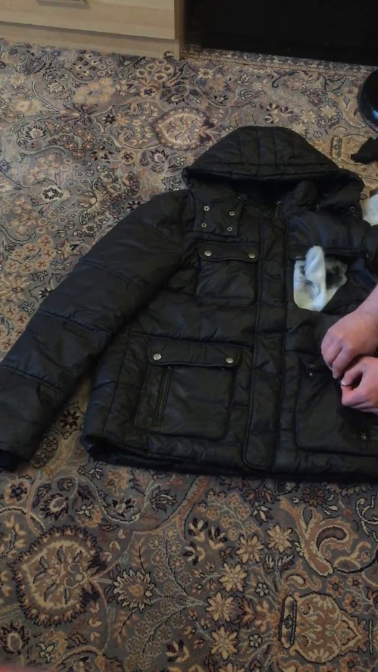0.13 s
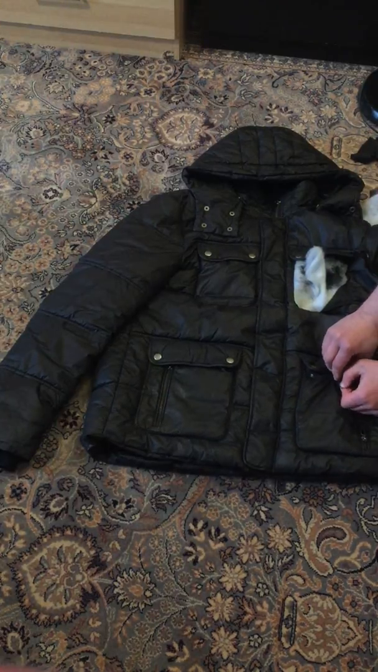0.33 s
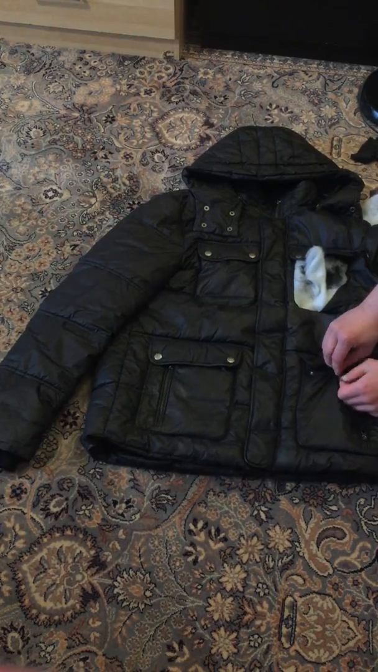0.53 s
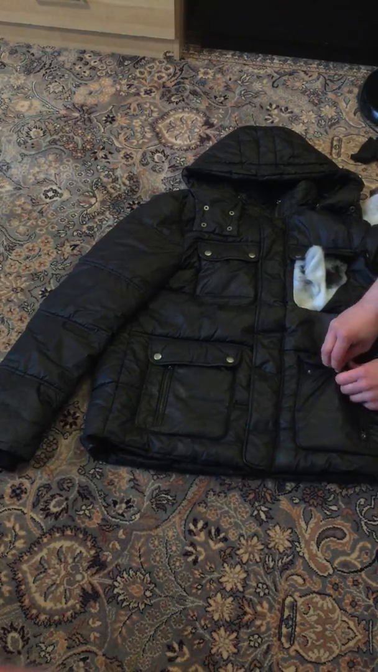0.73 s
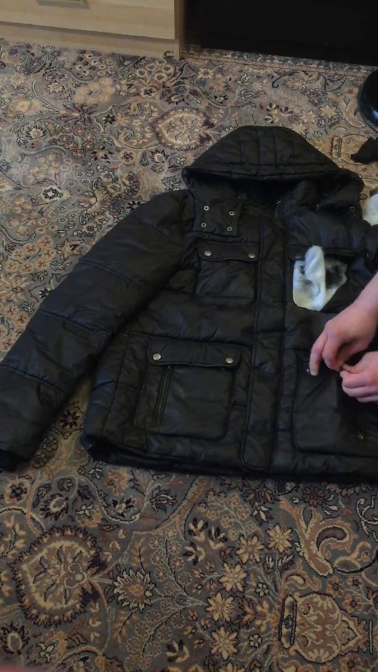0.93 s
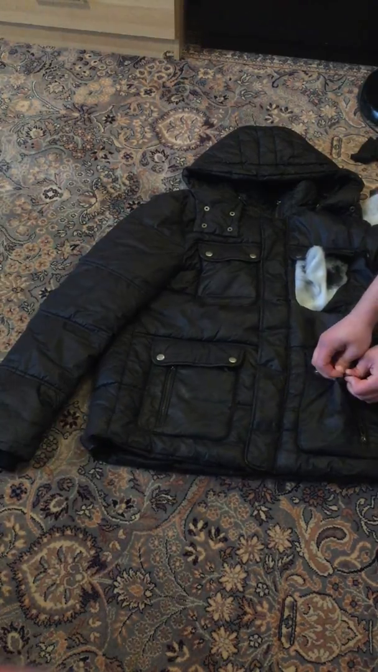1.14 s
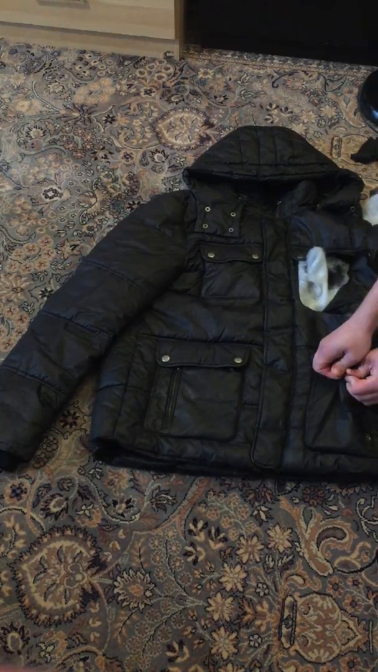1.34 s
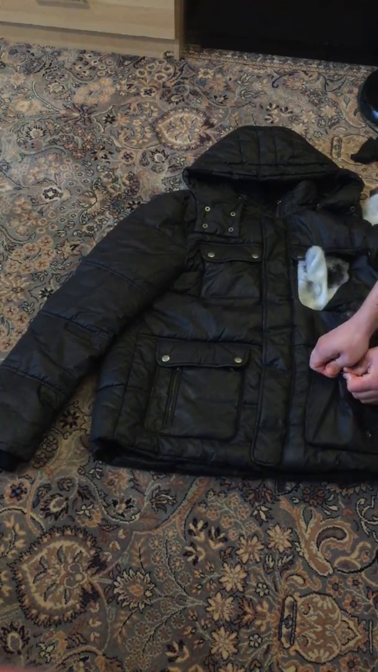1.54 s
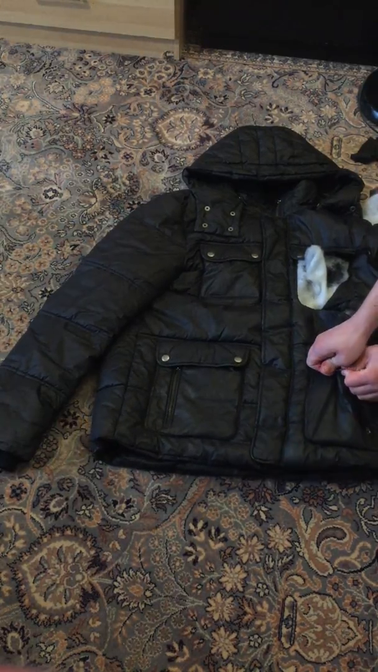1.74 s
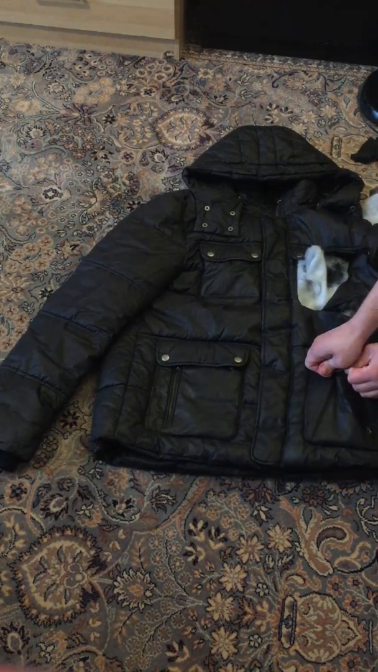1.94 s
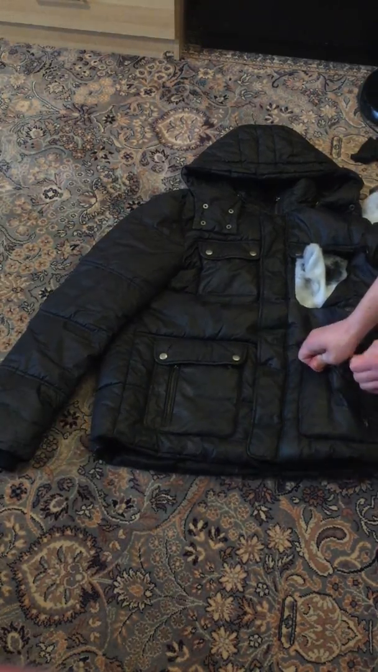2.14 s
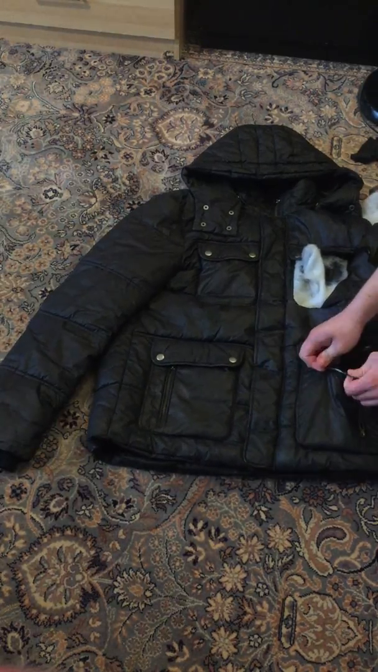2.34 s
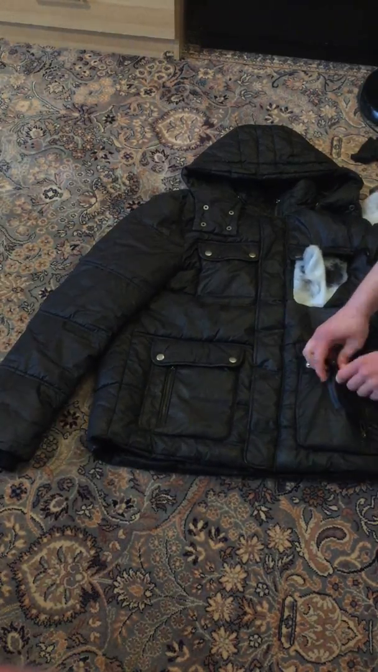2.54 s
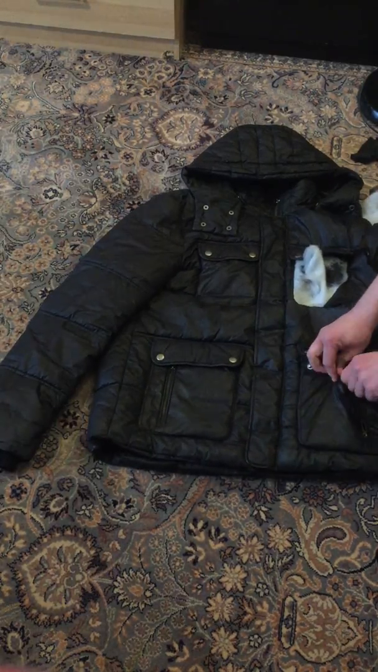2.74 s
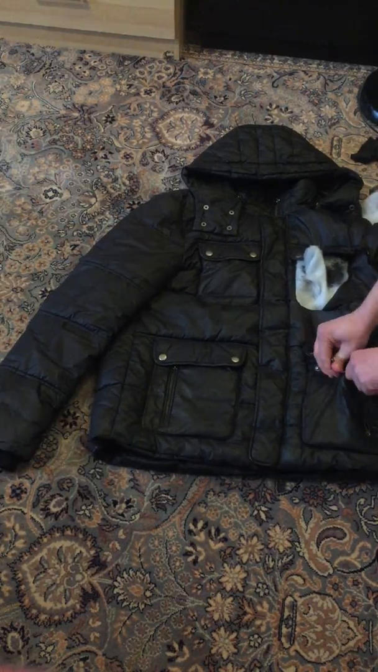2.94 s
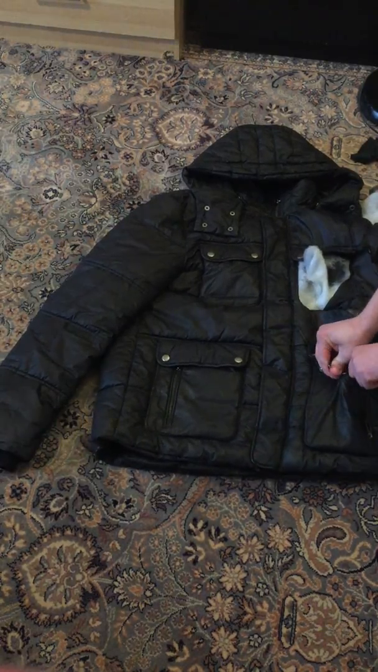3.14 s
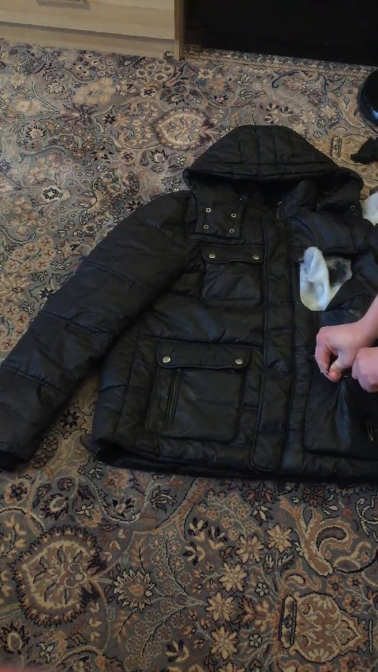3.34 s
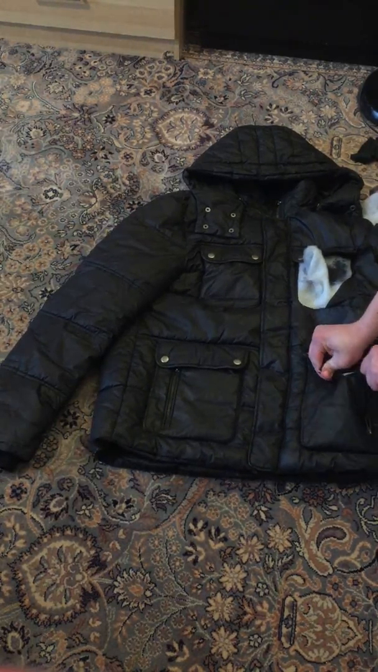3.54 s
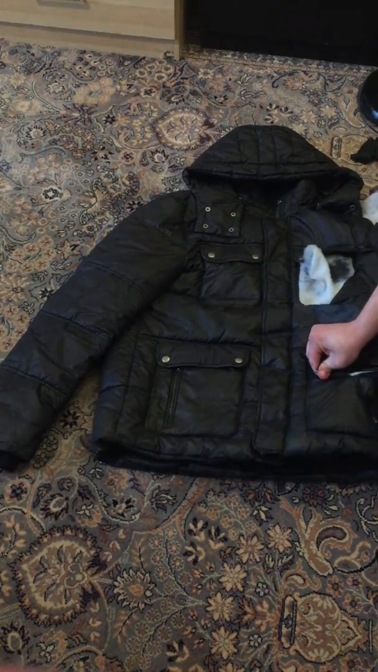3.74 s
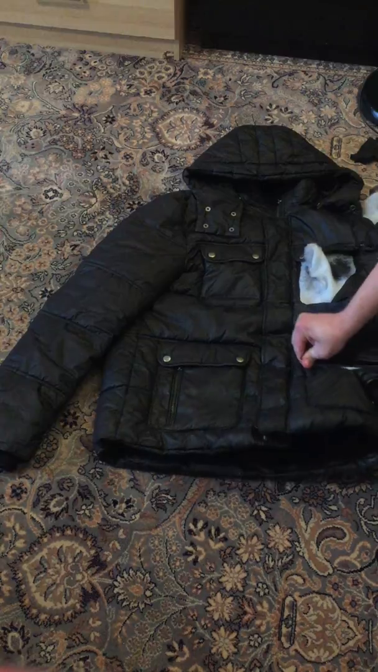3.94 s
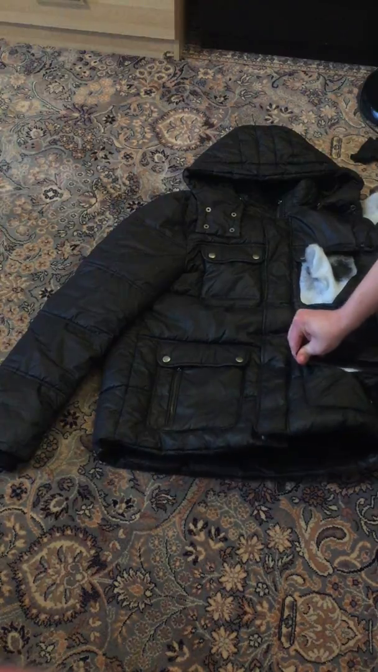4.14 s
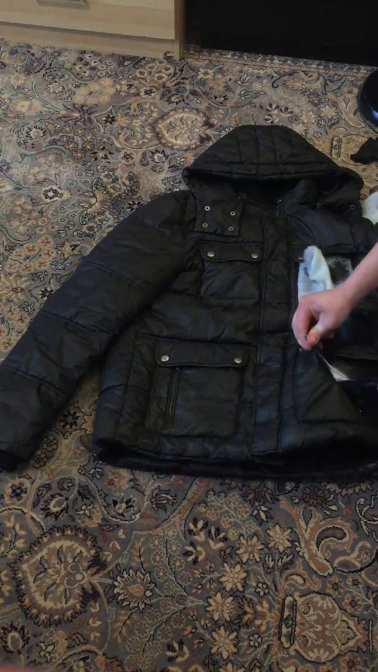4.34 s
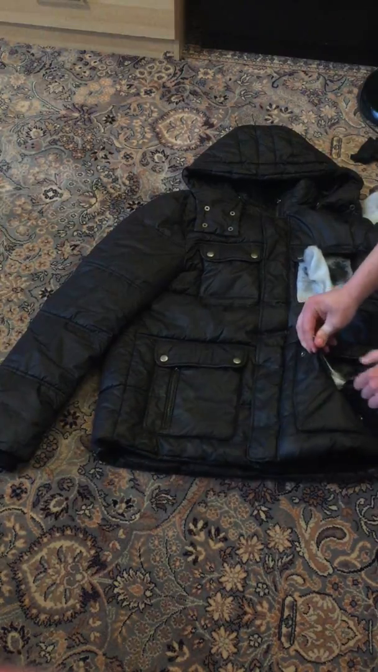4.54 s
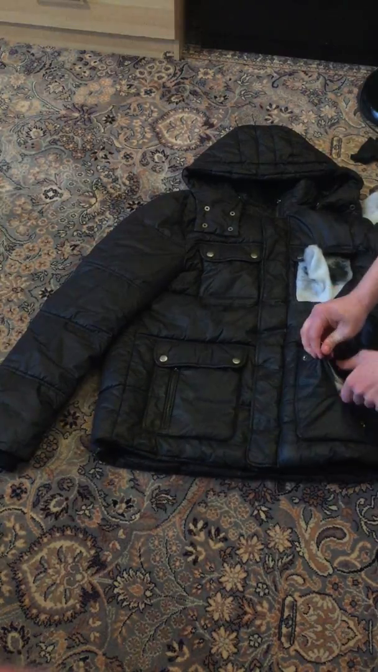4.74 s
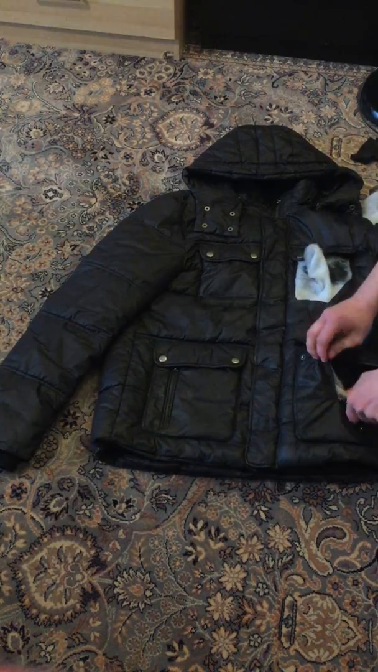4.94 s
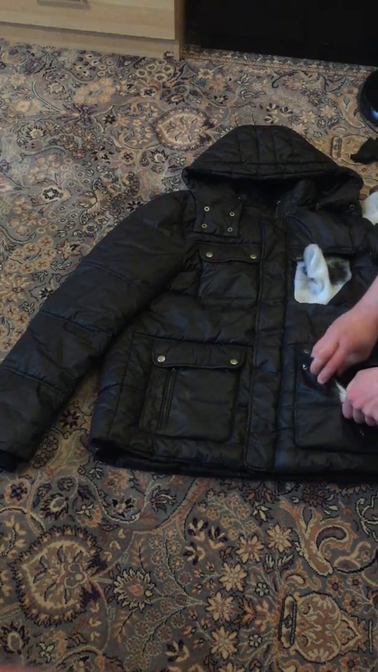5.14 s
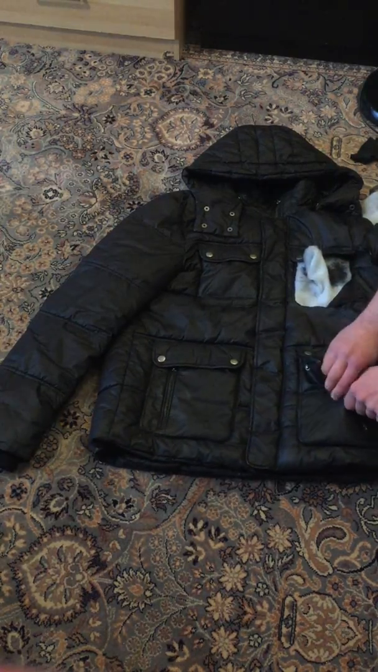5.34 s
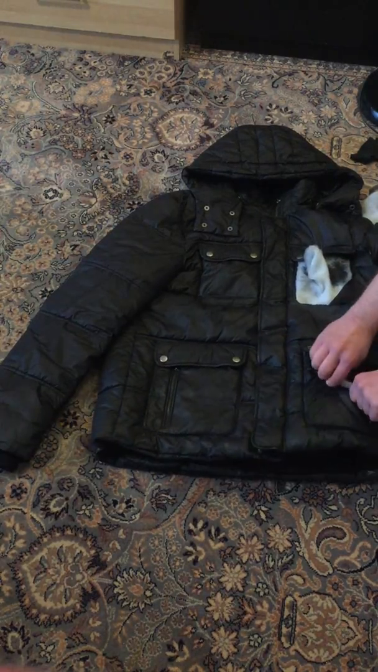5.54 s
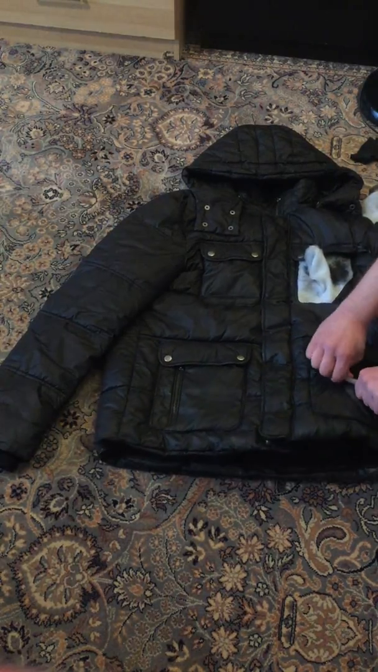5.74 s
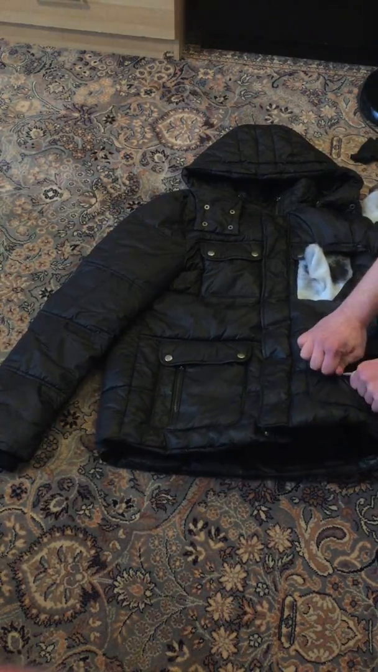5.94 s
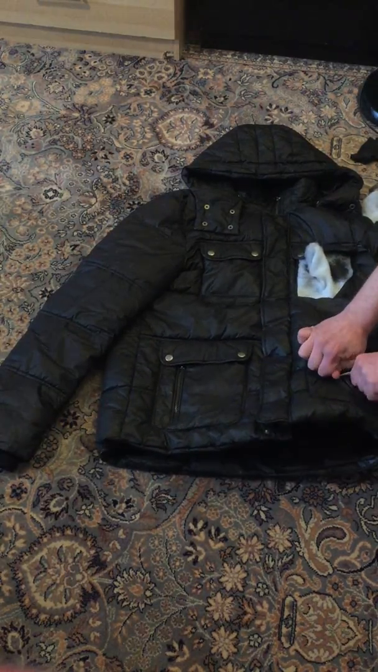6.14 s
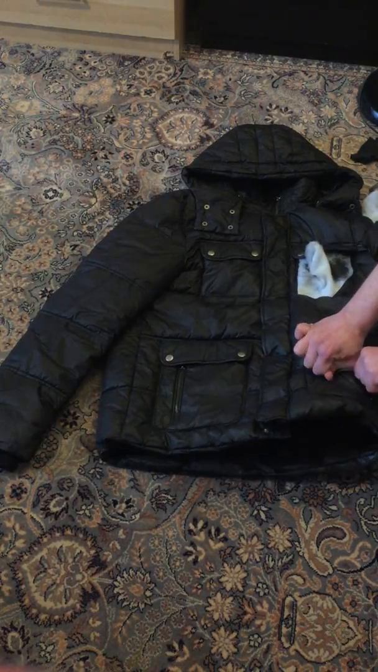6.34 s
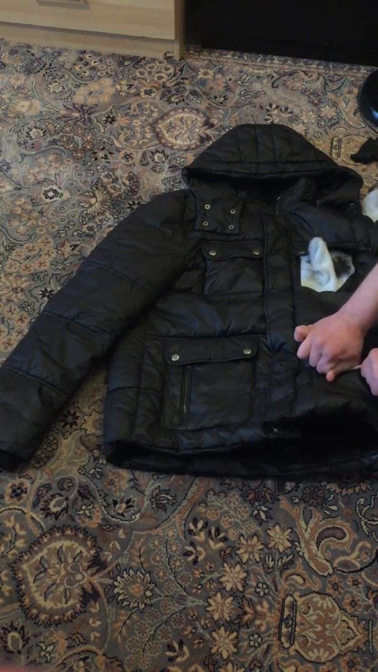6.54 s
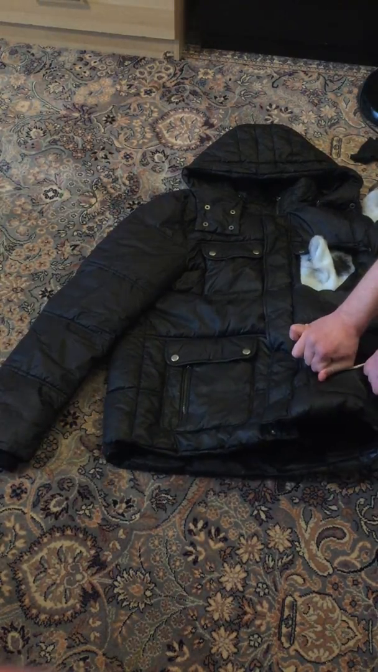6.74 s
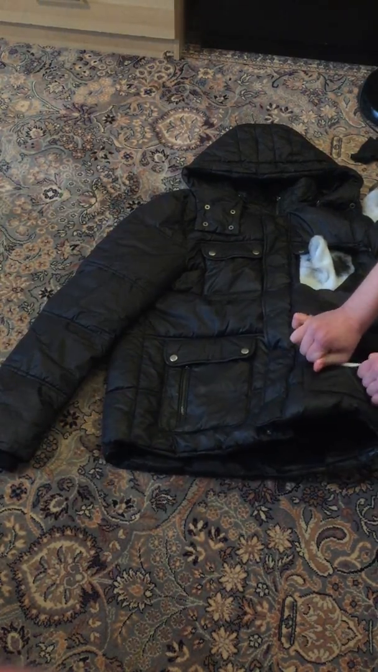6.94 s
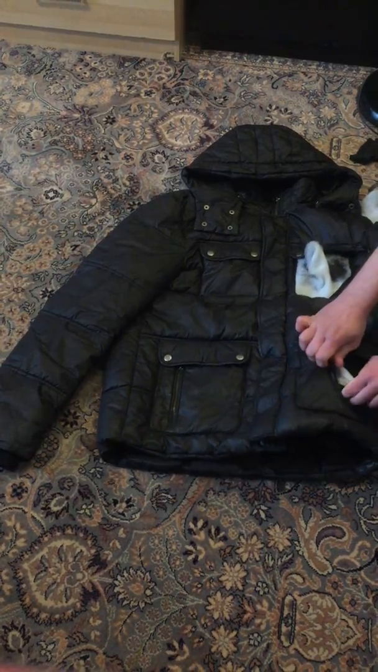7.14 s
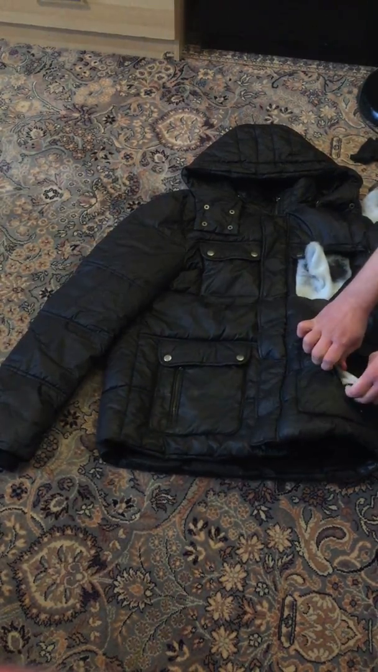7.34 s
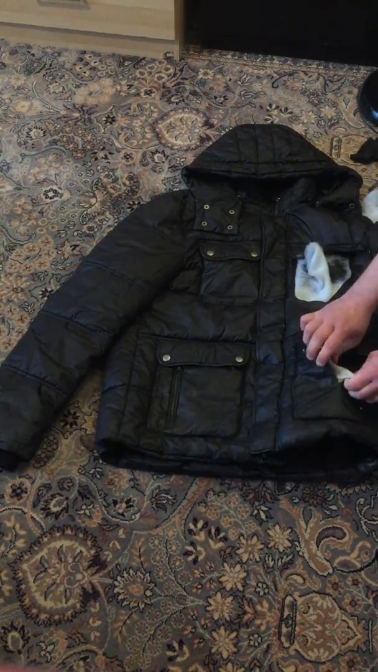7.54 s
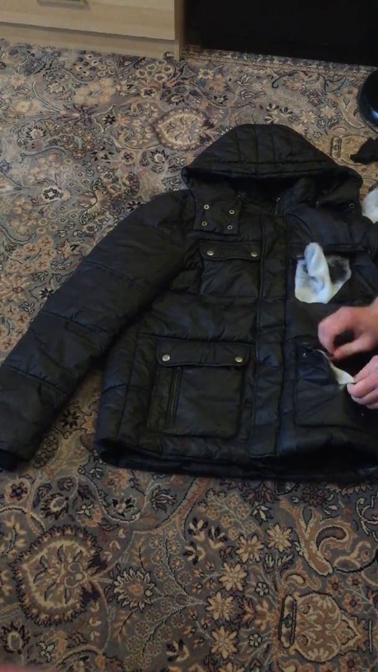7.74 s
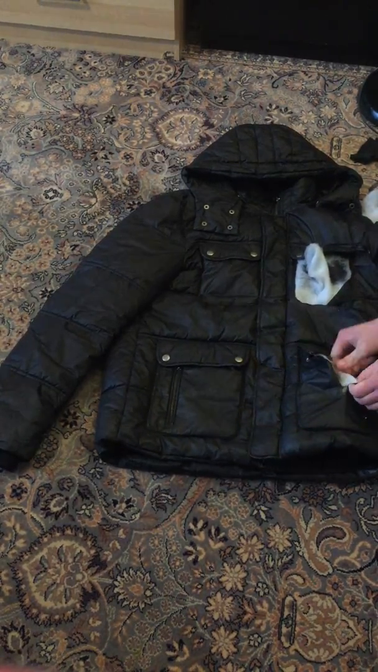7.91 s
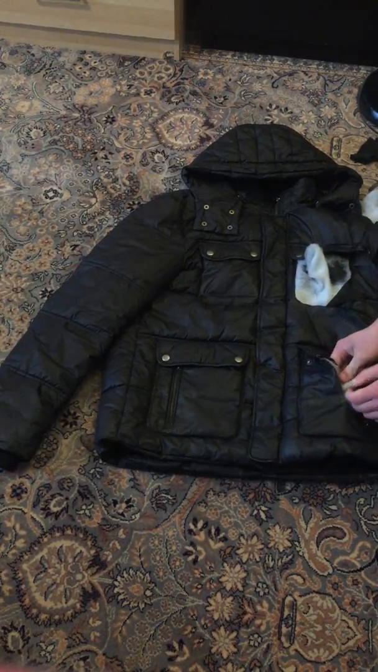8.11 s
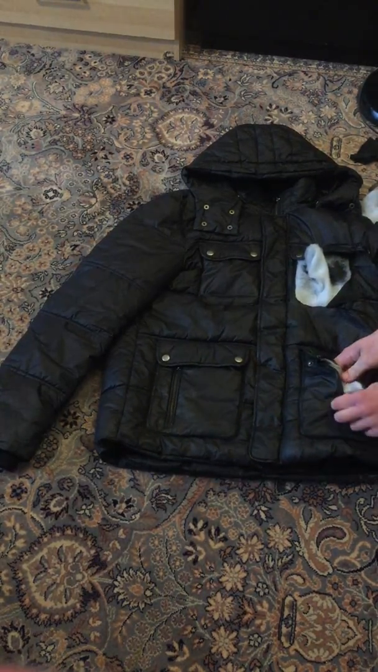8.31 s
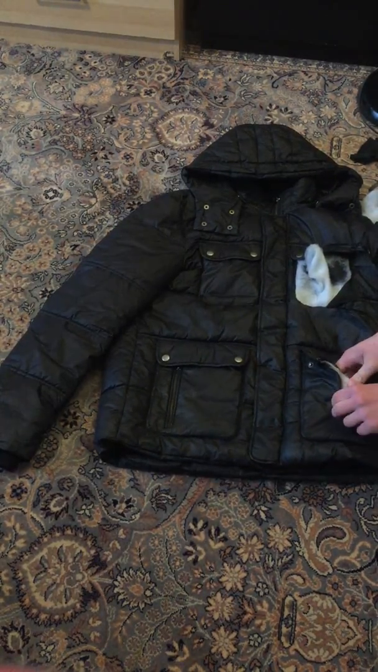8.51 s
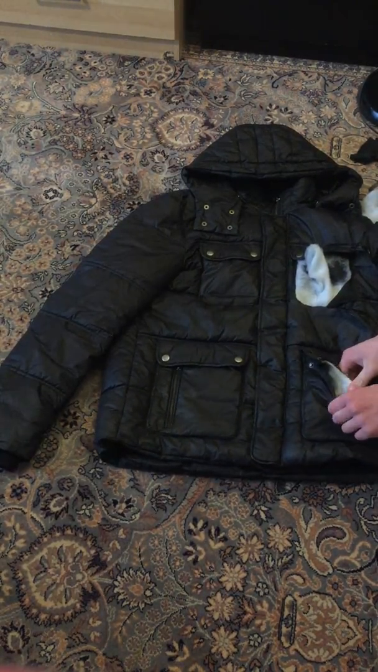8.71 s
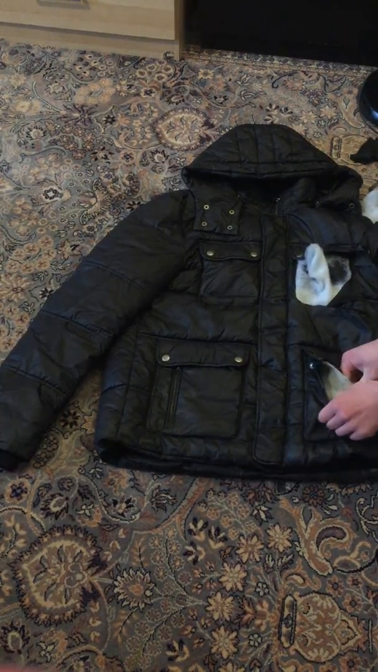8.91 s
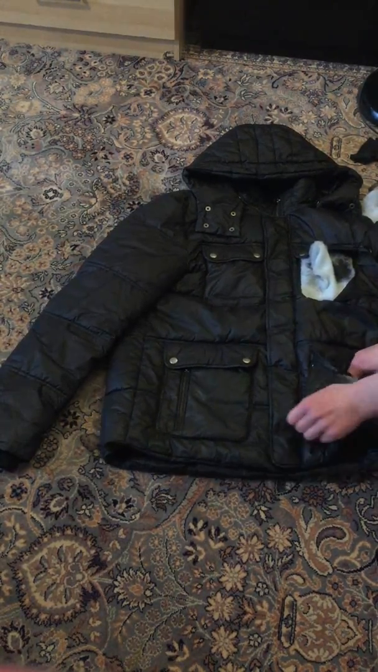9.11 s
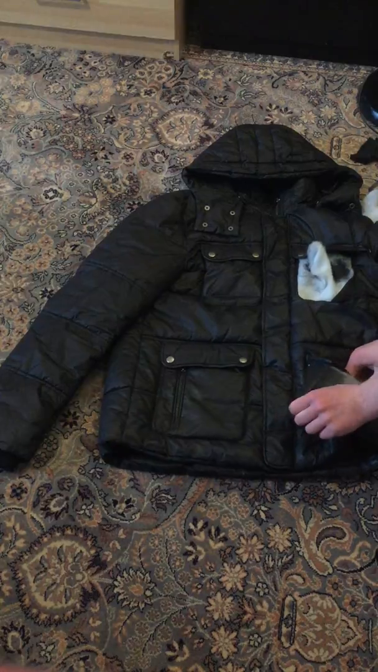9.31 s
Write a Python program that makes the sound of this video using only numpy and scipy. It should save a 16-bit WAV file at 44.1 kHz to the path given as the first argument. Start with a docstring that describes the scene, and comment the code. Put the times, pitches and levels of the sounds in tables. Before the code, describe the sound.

A quiet small room with steady soft hiss and a faint low engine hum swelling outside. In the first 1.8 s there is only gentle rustling of slick padded cloth and a tiny tick near 0.8. From about 1.9 to 2.3 s a short, crisp rip crackles out with several sharp snaps and a dull tug. Light swishes follow; a soft knock falls at 3.1. At 3.2 the cloth tears again, then from 3.4 to 4.2 s it rips long and loud, dense gritty crackle studded with hard cracks, strongest toward the end. Quiet rustling until 6.1, then dry stitches pop singly and rapidly until 6.95, the last very loud. Soft swishing around 7.2 and 8 s, with a small knock at 7.7. At 9.07 a dull jerk starts a thick, fast rip lasting a quarter second, leaving a short room ring. Close microphone.

```python
"""The synthetic shell of a padded jacket is ripped by hand in a small, quiet room.
Brittle fracture: stitches snap singly, each a jolt; the weave then fails in runs, as hails of random breaks.
Radiation: flapping panel, taut cloth and thread colour every break, and creases and folds resonate.
Friction: fine grains swish as cloth slides on itself; sudden tension: slack cloth jerks taut with dull knocks.
Reverberation adds a short cluster and a ringing tail; an engine outside hums faintly under a steady hiss."""
import sys
import numpy as np
from scipy import signal
from scipy.fft import rfft, irfft
from scipy.io import wavfile
from scipy.ndimage import uniform_filter1d, map_coordinates

SR = 44100
rng = np.random.default_rng(int(sys.argv[2]) if len(sys.argv) > 2 else 0)


def generate_wav(signal):
    """Clip the signal to [-1, 1] and save it as 16-bit WAV at the path in sys.argv[1]."""
    frames = np.transpose(np.atleast_2d(signal))
    scaled = np.clip(frames, -1, 1) * 32767
    pcm = np.round(scaled).astype(np.int16)
    wavfile.write(sys.argv[1], SR, pcm)


N = 413216
TIME = np.arange(N) / SR

# Table levels are relative; each source adds its own gain.
# still air and hiss, spectral density: (f/Hz, level/dB per Hz)
AIR_SPECTRUM = [(26, -20.5), (45, -10), (82, -5), (156, -10.5), (362, -13), (763, -18), (2220, -18.5),
                (9200, -28), (10400, -31), (11700, -28), (17000, -38.5)]
# swells of the engine outside: (t of peak/s, 1/e half-width/s, firing rate f/Hz, level/dB, octave re fundamental/dB)
ENGINE_SWELLS = [(.7, 0.3, 85, -71, -14), (1.25, 0.34, 86.4, -83.5, 10), (1.8, 0.37, 85.9, -67.5, -11.5),
                 (2.902, 0.613, 58.2, -70, -9.5), (6.35, 0.62, 64.5, -63.5, -15.5),
                 (7.6, 0.87, 65.5, -71.5, -3.5)]
# spectrum of the room tail: (f/Hz, level/dB)
TAIL_SPECTRUM = [(100, -2.5), (400, -3.5), (1100, -0.5), (1700, 0), (2700, -3), (5500, -6), (9000, -14.5),
                 (17000, -8.5)]
# reverberation time of the tail: (f/Hz, T60/s)
TAIL_DECAY = [(100, .26), (700, 0.27), (2000, 0.24), (5000, 0.22), (16000, 0.21)]
# pitches at which the room rings on most clearly: (f/Hz)
ROOM_RINGS_HZ = [365, 1367, 1548, 1668, 1880, 2389, 2666, 3188]
# cloth jerking taut: (t/s, level/dB, thump weight/dB, thump lag/s, slap centre f/Hz, thump f/Hz)
KNOCKS = [(0.819, -36.5, -21, 0.0022, 1290, 290), (2.158, -28, 8, 0.001, 1600, 200),
          (3.066, -23, 4, 0.008, 1650, 276), (3.477, -36, 9.5, 0.001, 1880, 318),
          (7.681, -30, -4.5, 0.0039, 1900, 325), (9.068, -26, 2, 0.0021, 1710, 353),
          (9.08, -33, 17.5, 0.002, 1600, 400)]
# cloth sliding under the hands: (t of peak/s, 1/e half-width/s, level/dB, brightness/dB)
SWISHES = [(0.715, 0.11, -70, -8), (1.032, 0.0098, -61, -4), (1.04, 0.23, -69, -5),
           (1.324, 0.077, -66, -10), (2.557, 0.031, -71.5, 3.5), (2.814, 0.07, -69.5, 3.5),
           (4.38, 0.17, -69, -4.5), (4.955, 0.29, -71.5, -2), (5.458, 0.024, -68, -3),
           (7.236, 0.0024, -54, -3.5), (7.265, 0.067, -64.5, 1), (7.96, 0.038, -69, 13),
           (8.028, 0.11, -70, -0.5)]
# taut folds that resonate: (t of peak/s, 1/e half-width/s, f/Hz, boost/dB, width as a share of f)
FOLDS = [(1.028, 0.023, 2700, 9.5, .14), (2.202, 0.026, 2000, 8, 0.43), (2.205, 0.016, 8600, 8, .14),
         (3.66, 0.09, 1450, 11.5, 0.39), (3.757, 0.039, 11700, 7.5, 0.13), (3.68, 0.3, 5200, 5, .06),
         (3.782, 0.099, 808, 6.5, .3), (4.023, 0.049, 1330, 11, 0.23), (4.064, 0.068, 289, 6, 0.27),
         (6.679, 0.15, 8100, 6, 0.2), (7.96, 0.091, 2800, 11, 0.12), (9.126, 0.017, 4300, 12.5, 0.23),
         (9.143, 0.097, 596, 14, 0.24), (9.15, 0.033, 9500, 7.5, 0.07), (9.206, 0.019, 11700, 9.5, 0.18),
         (9.213, 0.03, 1500, 8, 0.38)]
# spectrum of a breaking thread: (f/Hz, level/dB)
THREAD_SPECTRUM = [(50, -23), (160, -9), (245, -2), (340, 2), (480, -4), (690, -2.5), (1000, -10),
                   (1450, -1), (3200, -0.5), (9400, 1), (10450, -4.5), (11500, -3), (13500, -6),
                   (17000, -10.5)]
# corner points of the flap, body, middle and edge ranges: (f/Hz)
RANGES_HZ = [600, 1500, 3200, 6000, 9500, 12000]
# loudest stitches, each snapping alone: (t/s, level/dB, body/dB, edge/dB)
SNAPS = [(0.819, -27, 0.5, 1), (1.957, -29, -11, 11), (2.043, -13.5, 6, 8), (2.1567, -9.5, 3.5, 6),
         (2.169, -14.5, 3, 15), (2.2315, -11.5, 1.5, 4), (2.263, -13.5, -1, 13), (2.276, -20, 9, 16),
         (2.289, -23, -4, 7), (3.2325, -11, -5.5, 4), (3.301, -13.5, -17, 7), (3.3712, -18.5, -5, 12),
         (3.4204, -10, -5, 5), (3.4513, -8.5, -8.5, 6), (3.4776, -8.5, 2.5, 3), (3.5164, -7.5, -2, 1),
         (3.5304, -10, -14.5, 3.5), (3.542, -9, -2, 3.5), (3.554, -12, -13, 1), (3.562, -9, -20, 0),
         (3.598, -19, 4, 13), (3.612, -10, 0.5, 4), (3.6406, -10, -3.5, 4), (3.6858, -3.5, -2.5, 3),
         (3.719, -7, -10, 0), (3.904, -5.5, 3.5, -3), (3.9845, -8, 0, 8), (4.0236, -12.5, 8.5, 16),
         (4.0908, -2, -24, 4), (4.1297, -9, -5, -1), (4.1364, -6, -7, -2), (4.142, -7, -14, -1.5),
         (4.1478, -10, 7, 0.5), (4.1583, 0.5, -3, -11), (4.1829, -9, 1.5, -3), (6.1386, -9, -22, 6),
         (6.1396, -9, -11.5, -1), (6.185, -6.5, -11.5, -11), (6.197, -17, -10, 5), (6.208, -7, -14, -6.5),
         (6.243, -8, -5.5, -10), (6.2554, -15, -3, -1), (6.261, -15, -7, 3), (6.2733, -9, -12, -6),
         (6.2939, -10, -3, 1), (6.313, -9, -6.5, -3), (6.3399, -8, -1, 0), (6.3592, -10.5, -5, 2),
         (6.3899, -10.5, 4, 6), (6.4196, -24, -20, 5), (6.44, -6, 3, 1), (6.4486, -9.5, -6, -2),
         (6.474, -12, 4, 5), (6.5874, -6.5, -6.5, -2), (6.6101, -11.5, -6.5, 4), (6.6423, -11.5, -7, -3),
         (6.686, -14, -9, -2), (6.7014, -17, -10, 2), (6.714, -12.5, -13, -2.5), (6.7331, -11.5, -12, 2),
         (6.7509, -7.5, -7, -13), (6.7662, -7.5, -8, -3), (6.782, -14.5, 0.5, -6), (6.7866, -13, 4, -1),
         (6.8108, -9.5, 1, -2), (6.8593, -16, 0, 6), (6.8779, -7.5, -0.5, -3), (6.9072, -0.5, 1, -9),
         (6.9444, -7, -3, -2), (9.068, -18, 15.5, 3), (9.213, -12, 3, 8), (9.2275, -11, 5, 7),
         (9.232, -15, -3, 16.5), (9.244, -13, 14, 10), (9.2581, -13.5, 15.5, 3), (9.266, -18.5, 15, 0),
         (9.281, -17, 9, 1)]
# a loaded seam shedding small ticks: (start t/s, end t/s, level/dB)
STRAINS = [(1.903, 1.98, -36), (3.275, 3.51, -27.5), (6.737, 6.9, -45)]
# runs of the tear: (start t/s, time to top speed/s, length/s, level/dB, breaks per s, body/dB, edge/dB, flap/dB)
RUNS = [(1.867, 0.013, 0.026, -46, 1700, -5.5, 9, -2), (1.964, 0.045, 0.12, -45, 1030, 1, 9, -8),
        (2.157, 0.044, 0.15, -31.5, 1700, 0, 8.5, -6), (3.231, 0.02, 0.078, -41, 910, -0.5, 3, -6.5),
        (3.471, 0.003, 0.035, -34.5, 2900, -5, 7, -10), (3.512, 0.13, 0.11, -28.5, 1620, -3.5, 3, -7),
        (3.637, 0.018, 0.061, -30, 1340, -4.5, 3, -2.5), (3.695, 0.056, 0.16, -23.5, 3400, -3, -0.5, -6.5),
        (3.865, 0.0057, 0.037, -30.5, 1250, -1.5, 0, -6), (3.905, 0.032, 0.13, -28.5, 1940, 0.5, 6.5, -2),
        (4.021, 0.043, 0.14, -28.5, 1930, 0.5, 8, 0.5), (4.111, 0.029, 0.091, -28.5, 1200, -1, 2, -2.5),
        (9.067, 0.024, 0.049, -33, 1630, 0, 3, -4), (9.099, 0.05, 0.15, -25.5, 5400, -0.5, 5, -15),
        (9.171, 0.034, 0.14, -26.5, 2370, 2.5, 0.5, -10.5)]

# opening and closing ramps of a run: offsets from its top level in dB, and the exponent of both ramps
RUN_START_DB, RUN_END_DB, RUN_CURVE = -5.5, -16, 1.6
RATE_PER_LEVEL = 0.63  # a slower tear breaks fewer threads: dB of rate per dB of level
SLACKEN_DB, EDGE_RISE_DB = 2.5, 0.5  # change of body and of edge level over a run
FRAY_T60_S = .004  # decay of the fraying after a break
CRACK_LEAD_S = .001  # a crack starts to build this long before its peak
FOLD_SAG = .03  # share by which a fold's pitch sags over one half-width
ROOM_LENGTH_S = .33  # the room response ends here
SNAP_ROOM_DB = -1.5  # a lone stitch excites the room less than a running tear
LOW_CUT_HZ, TOP_HZ = 38, 17300


def undb(db):
    """Level: decibels to amplitude ratio."""
    return 10 ** (np.asarray(db) / 20)


def along(points, hz):
    """Interpolation: read (f/Hz, value) points on a log-frequency axis."""
    f, value = np.transpose(points)
    return np.interp(np.log(hz + 1), np.log(f), value)


def colour(x, points):
    """Linear filtering: multiply the spectrum by (f/Hz, level/dB) points."""
    hz = np.fft.rfftfreq(len(x), 1 / SR)
    return irfft(rfft(x) * undb(along(points, hz)), len(x))


def click(points, size=1024):
    """Minimum phase: folding the cepstrum gives the shortest causal click of a given spectrum."""
    hz = np.fft.rfftfreq(size, 1 / SR)
    cepstrum = irfft(np.log(undb(along(points, hz))))
    cepstrum[1:size // 2] *= 2
    cepstrum[size // 2 + 1:] = 0
    return irfft(np.exp(rfft(cepstrum)))


def through(x, response):
    """Convolution: pass a sound through an impulse response."""
    return signal.oaconvolve(x, response)[:N]


def unit(x):
    """Normalisation: scale to an energy of one."""
    return x / np.sqrt(np.sum(x ** 2))


def even(x, size):
    """Partial whitening: smooth a burst's chance colour over `size` bins, at an energy of one."""
    spectrum = rfft(x)
    power = uniform_filter1d(np.abs(spectrum) ** 2, size)
    return unit(irfft(spectrum / np.sqrt(power)))


def fade(t, t60):
    """Exponential decay: 60 dB in t60 seconds, starting at t = 0."""
    return (t >= 0) * np.exp(-np.log(1000) * np.abs(t) / t60)


def add(track, s, sound):
    """Superposition: mix a sound into a track at time s."""
    start = int(round(s * SR))
    track[start:start + len(sound)] += sound[:N - start]


def swell_shape(s, length):
    """Gaussian envelope: peak at s, 1/e half-width of `length` seconds."""
    return np.exp(-((TIME - s) / length) ** 2)


def waver(rate):
    """Random modulation: chance values of unit spread, `rate` per second, joined by straight lines."""
    steps = rng.standard_normal(int(rate * N / SR) + 2)
    return np.interp(TIME * rate, np.arange(len(steps)), steps)


def crackle(rate, spread_db, size=700):
    """Shot noise: uneven impulses at a chance rate, their power evened out over `size` samples."""
    count = len(rate)
    sizes = undb(spread_db * np.clip(rng.standard_normal(count), -2, 2))
    sizes = sizes * rng.choice([-1, 1], count)
    pulses = sizes * (rng.random(count) < rate / SR)
    power = np.abs(uniform_filter1d(pulses ** 2, size))
    return pulses / np.sqrt(power + 1e-4)


def background(air_db=-68, waver_db=2, drift=0.0027):
    """Harmonic series over broadband noise: the engine's two lowest harmonics and a steady hiss."""
    turns = 2 * np.pi * np.cumsum(1 + drift * waver(2.1)) / SR  # phase of 1 Hz with a drifting pitch
    engine = 0
    for s, length, hz, db, octave_db in ENGINE_SWELLS:
        harmonics = np.sin(hz * turns) + undb(octave_db) * np.sin(2 * hz * turns)
        engine = engine + undb(db) * swell_shape(s, length) * harmonics
    air = colour(rng.standard_normal(N), AIR_SPECTRUM)
    hiss = undb(air_db) * air / np.std(air)
    return hiss + np.sqrt(2) * undb(waver_db * waver(4.4)) * engine


def room(x, wall_s=.0056, wall_db=-5, wall_t60=0.0086, tail_s=0.0057, tail_db=-0.44, ring_db=-1,
         ring_t60=.16):
    """Reverberation: an early cluster from nearby furniture, a diffuse tail and ringing room pitches."""
    t = TIME[:16384]
    hz = np.fft.rfftfreq(len(t), 1 / SR)
    tail = 0
    centres, t60s = np.transpose(TAIL_DECAY)
    for share, t60 in zip(np.eye(len(t60s)), t60s):
        decay = even(rng.standard_normal(len(t)) * fade(t - tail_s, t60), size=48)
        band = np.sqrt(along(np.c_[centres, share], hz))  # overlapping bands, each with its own T60
        tail = tail + irfft(rfft(decay) * band)
    tail = colour(even(tail, size=16), TAIL_SPECTRUM)

    ringing = fade(t - wall_s, ring_t60)
    tones = sum(np.sin(2 * np.pi * (ring_hz * t + rng.random())) for ring_hz in ROOM_RINGS_HZ)
    rings = tones * 2 * ringing / ringing.sum()

    cluster = even(rng.standard_normal(len(t)) * fade(t - wall_s, wall_t60), size=300)
    cluster = colour(cluster, [(300, 0), (2000, 3.0), (5000, -7.5), (9000, -16.5), (16000, -5.0)])

    echoes = undb(tail_db) * tail + undb(wall_db) * cluster + undb(ring_db) * rings
    return through(x, echoes * (t > wall_s) * (t < ROOM_LENGTH_S))


def knocks(slap_db=5, slap_t60=0.034, thump_db=-4, thump_t60=0.014, pad_db=-1, pad_t60=0.053,
           attack_s=0.0018):
    """Sudden tension: slack cloth jerks taut in a broad slap, then the padding thumps as a damped mode."""
    out, t = np.zeros(N), TIME[:8192]
    onset = np.minimum(t / attack_s, 1)
    # (multiple of the slap's centre, level/dB)
    slap_shape = [(.1, -10), (.45, -6), (1, 2), (1.45, 0.5), (2.2, -11), (4, -19.5), (7, -38)]
    for s, db, weight_db, lag, slap_hz, thump_hz in KNOCKS:
        slap = even(rng.standard_normal(len(t)) * fade(t, slap_t60), size=120)
        slap = colour(slap, [(k * slap_hz, k_db) for k, k_db in slap_shape])
        add(out, s, undb(db + slap_db) * onset * unit(slap * (t < 2 * slap_t60)))

        pad_colour = [(thump_hz / 2, -21.5), (thump_hz, 9.5), (2 * thump_hz, -6),
                      (1000, -9), (2000, -16.5), (6000, -51.5)]
        pad = unit(colour(rng.standard_normal(len(t)), pad_colour) * fade(t, pad_t60))
        thump = unit(np.sin(2 * np.pi * thump_hz * t) * fade(t, thump_t60))
        padding = undb(thump_db) * thump + undb(pad_db) * pad
        add(out, s + lag, undb(db + weight_db) * onset * padding)
    return out


def swishes(grain_rate=5000, spread_db=5):
    """Sliding friction: the ribbed weave yields fine grains that swell and fade, in a dull and a bright part."""
    dull_power, bright_power = np.zeros((2, N))
    for s, length, db, bright_db in SWISHES:
        swell = undb(db) * swell_shape(s, length)
        dull_power += swell ** 2
        bright_power += (swell * undb(bright_db)) ** 2
    grains = crackle(np.full(N, grain_rate), spread_db)
    dull = colour(grains * np.sqrt(dull_power), [
        (60, 15.5), (300, 10.0), (600, 3.5), (1500, 7.5), (2700, 4.5), (3600, -3), (7000, -12.5), (16000, -41)])
    bright = colour(grains * np.sqrt(bright_power), [
        (1000, -27), (3000, -1.0), (5000, 3.0), (8500, 5.5), (10400, 2.5), (12000, 3.0), (17000, 0.5)])
    return dull + bright


def folds(x, shift_db, shift_rate=30, count=34):
    """Time-varying resonance: creases make ranges swell and sink; taut folds resonate, sagging in pitch."""
    hz, t, spectra = signal.stft(x, SR, nperseg=512, noverlap=384)
    pitch = np.log(hz + 100)
    # random levels on a grid of pitch and time, read with linear interpolation
    creases = rng.standard_normal((count + 2, int(shift_rate * t[-1]) + 2))
    pitch_place = count * (pitch - pitch[0]) / np.ptp(pitch)
    place = np.meshgrid(pitch_place, t * shift_rate, indexing="ij")
    db = shift_db * map_coordinates(creases, place, order=1)
    for s, length, fold_hz, boost_db, width in FOLDS:
        age = (t - s) / length
        detune = np.log((hz[:, None] + 1) / fold_hz) + FOLD_SAG * age
        db = db + boost_db * np.exp(-(detune / width) ** 2 - age ** 2)
    return signal.istft(spectra * undb(db), SR, nperseg=512, noverlap=384)[1][:N]


def cloth(flap, body, middle, edge, twang_hz=7500, twang=0.46):
    """Radiation: the whole panel flaps, taut cloth near the tear gives body, the thread itself the edge."""
    size = 1024
    hz = np.fft.rfftfreq(size, 1 / SR)
    reaches = np.eye(4)[:, [0, 1, 1, 2, 2, 3]]  # share of each range at the six corner points
    out = 0
    for drive, reach in zip((flap, body, middle, edge), reaches):
        band = np.fft.fftshift(irfft(np.interp(hz, RANGES_HZ, reach)))
        out = out + signal.oaconvolve(drive, band, mode="same")
    # all-pass dispersion: taut cloth delays the range around its twang and draws each break out
    poles = [1, -2 * twang * np.cos(2 * np.pi * twang_hz / SR), twang ** 2]
    return signal.lfilter(poles[::-1], poles, through(out, click(THREAD_SPECTRUM)))


def crack(strands_db=-2, shiver_db=-12, fibre_db=-21, fibre_s=0.026):
    """Brittle fracture: one jolt and a burst of last strands; the cloth shivers and a late fibre lets go."""
    t = TIME[:2048]
    strands = unit(rng.standard_normal(len(t)) * fade(t - CRACK_LEAD_S, .0018))
    shiver = unit(rng.standard_normal(len(t)) * fade(t - CRACK_LEAD_S, .01))
    out = undb(strands_db) * strands + undb(shiver_db) * shiver
    out[int(CRACK_LEAD_S * SR)] += .65  # the jolt
    fibre_at = min(CRACK_LEAD_S + rng.random() * fibre_s, t[-1])
    out[int(fibre_at * SR)] += undb(fibre_db)
    return even(out, size=50)


def stitches(gain_db=1.5, flap_db=-12, tick_rate=45, tick_spread_db=4, tick_body_db=-7, tick_edge_db=-3):
    """Impulsive excitation: each loud stitch or small tick of a straining seam drives the cloth with a crack."""
    drives = np.zeros((4, N))
    ticks = []
    for start, end, db in STRAINS:
        for k in range(int((end - start) * tick_rate)):
            s = start + (k + rng.random()) / tick_rate
            tick_db = db + tick_spread_db * rng.standard_normal()
            ticks.append((s, tick_db, tick_body_db, tick_edge_db))
    for s, db, body_db, edge_db in SNAPS + ticks:
        snap = crack()
        for drive, range_db in zip(drives, (body_db + flap_db, body_db, 0, edge_db)):
            add(drive, s - CRACK_LEAD_S, undb(db + gain_db + range_db) * snap)
    return drives


def slips(count, rate, jitter=.45):
    """Stick and slip: the pull lets go at once, then ebbs until the next slip; runs from 1 down to -1."""
    gaps = np.exp(jitter * rng.standard_normal(256)) / rate
    phase = np.interp(TIME[:count], np.cumsum(gaps) - gaps[0], np.arange(len(gaps)))
    return 1 - 2 * (phase % 1)


def tear(run, gain_db=-3.0, spread_db=1.0, fray_db=-5.5, catch_db=4.0, catch_rate=100, tone_db=1.5,
         surge_db=2.0, surge_rate=35):
    """Progressive fracture: a hail of thread breaks of varied tone, trailed by the fizz of fraying fibres."""
    start, rise, length, top_db, top_rate, body_db, edge_db, flap_db = run
    t = TIME[:16384]
    progress = np.minimum(t / length, 1)
    opening_db = RUN_START_DB * np.interp(t, [0, rise], [1, 0]) ** RUN_CURVE
    closing_db = RUN_END_DB * np.interp(t, [rise, length], [0, 1]) ** RUN_CURVE
    speed_db = opening_db + closing_db
    rate = top_rate * undb(RATE_PER_LEVEL * speed_db)
    # the cloth slackens: the body swells and the edge shifts with it
    body = body_db + SLACKEN_DB * (progress - .5)
    edge = edge_db + EDGE_RISE_DB * (progress - .5)

    # a slow tear catches and slips; a fast one runs more evenly
    breaks = (t < length) * crackle(rate, spread_db)
    breaks = breaks * undb(catch_db * np.sqrt(1000 / rate) * slips(len(t), catch_rate))
    # the hands tug unevenly, so the breaks come in coarse surges
    breaks = breaks * undb(surge_db * slips(len(t), surge_rate))

    drives = np.zeros((4, N))
    fray_power = unit(fade(TIME[:512], FRAY_T60_S)) ** 2
    for drive, range_db in zip(drives, (body + flap_db, body, 0, edge)):
        toned = breaks * undb(tone_db * rng.standard_normal(len(t)))
        fraying = np.sqrt(np.convolve(toned ** 2, fray_power)[:len(t)])
        fizz = undb(fray_db) * fraying * rng.standard_normal(len(t))
        add(drive, start, undb(top_db + speed_db + gain_db + range_db) * (toned + fizz))
    return drives


def scene():
    """Superposition: snaps and tears radiate through cloth, and they, swishes and knocks excite one room."""
    snaps = folds(cloth(*stitches()), shift_db=2.0)
    torn = cloth(*sum(tear(run) for run in RUNS))
    rips = folds(torn + swishes(), shift_db=3.0) + knocks()
    reverberation = room(undb(SNAP_ROOM_DB) * snaps + rips)
    return (snaps + rips + reverberation + background())[None]


def record(dry):
    """Band limitation: cut the deepest bass and the very top."""
    low_cut = signal.butter(4, LOW_CUT_HZ, "high", fs=SR, output="sos")
    top_cut = signal.ellip(8, .2, 60, TOP_HZ, fs=SR, output="sos")
    return signal.sosfilt(top_cut, signal.sosfilt(low_cut, dry))


dry = scene()
out = record(dry)
generate_wav(out)
```